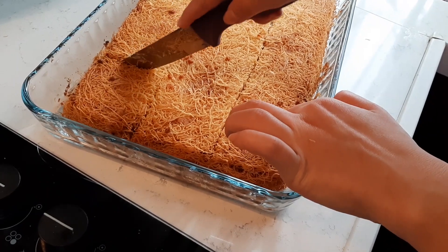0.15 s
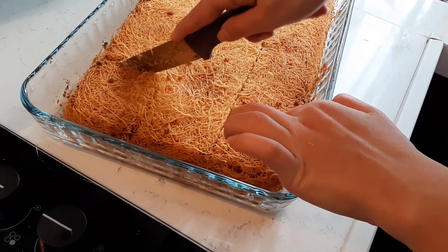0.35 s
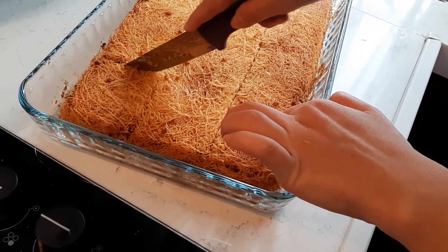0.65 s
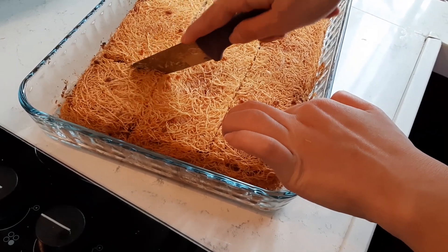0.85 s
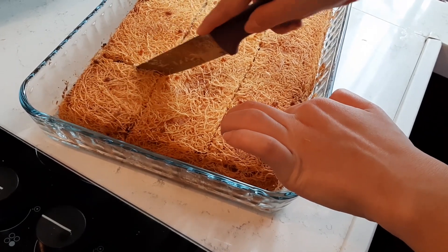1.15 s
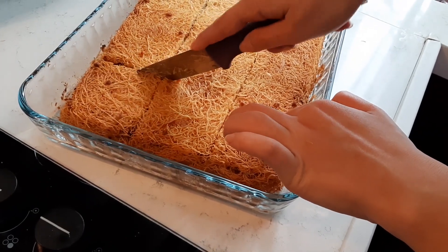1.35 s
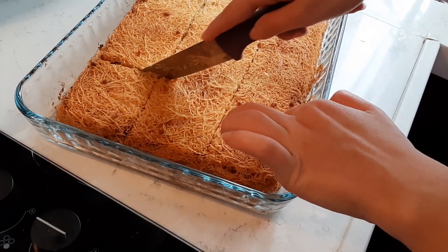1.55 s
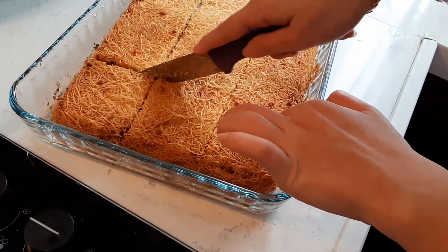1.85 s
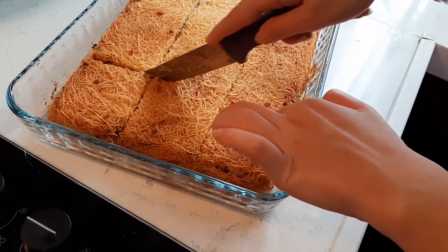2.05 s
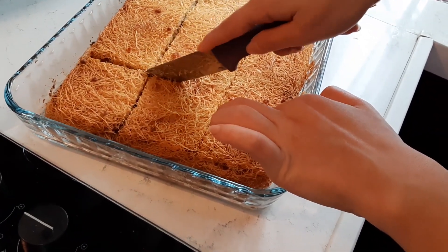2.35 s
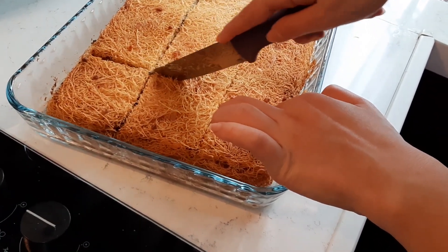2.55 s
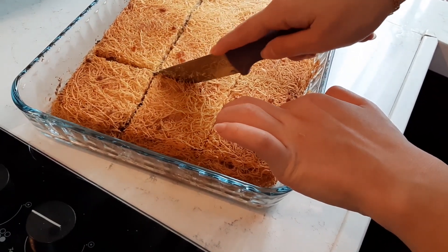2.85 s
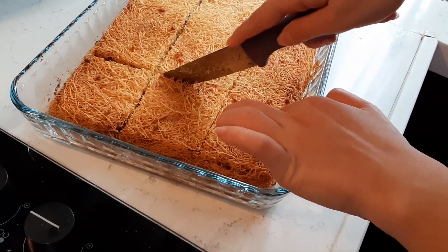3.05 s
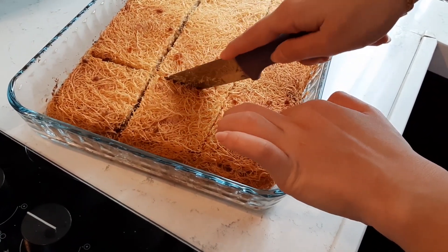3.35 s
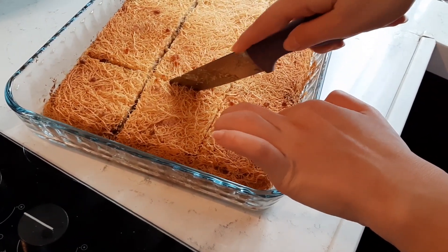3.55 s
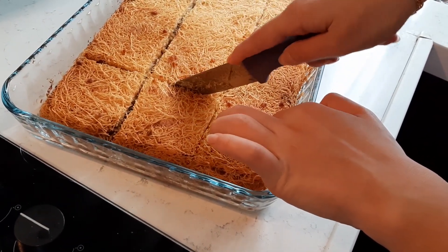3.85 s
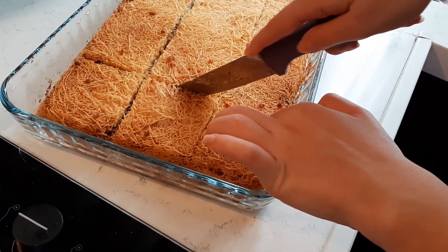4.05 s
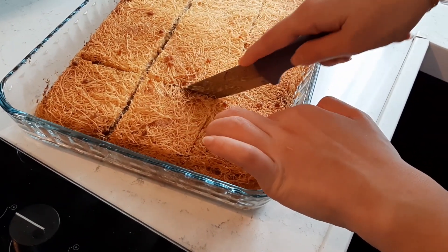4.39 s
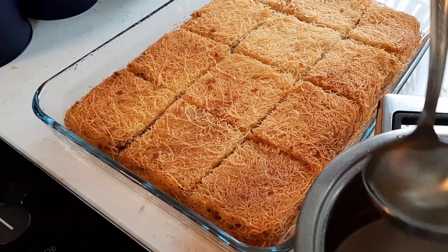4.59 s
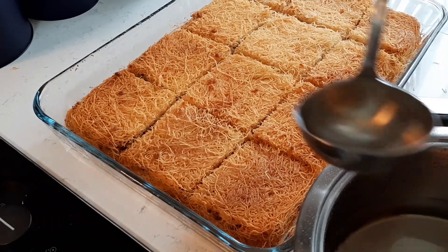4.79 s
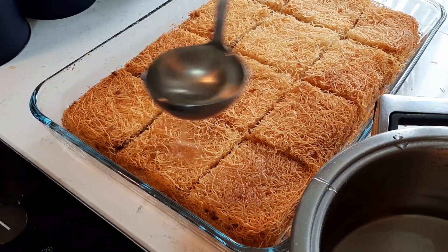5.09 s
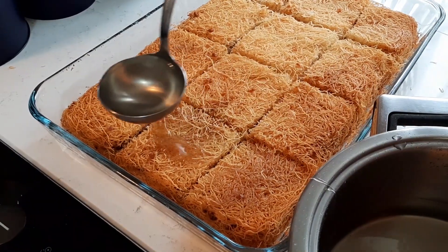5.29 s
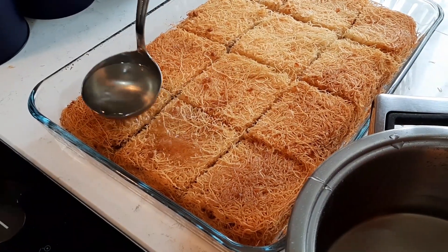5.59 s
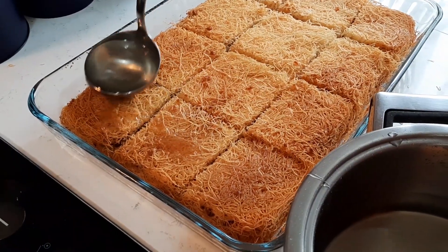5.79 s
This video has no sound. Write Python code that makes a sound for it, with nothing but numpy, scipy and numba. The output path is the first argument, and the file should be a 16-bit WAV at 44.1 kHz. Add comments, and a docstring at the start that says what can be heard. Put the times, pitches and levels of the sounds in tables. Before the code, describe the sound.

Close stereo in a small hard kitchen: a knife bites through dry shredded pastry about twice a second, crackling brittle strands and ending each stroke with a loud clack on glass. Lighter scrapes, faint edge whines and dish rumble fill the gaps. At about 4.5 seconds the cutting cuts off, leaving faint appliance noise, a soft falling squeak, a drop's tick and light rustles.

```python
"""Knife through crisp pastry in a glass dish

Two microphones close by in a small hard kitchen. A knife saws through shredded pastry: random fractures make the
crunch, damped modes of the dish ring at each knock, and filtered noise makes the rub of the blade, the rumble of
the dish on the counter, a short early ping and the gliding whine of the edge. The cutting stops short, and over the
steady kitchen noise come a squeak of falling pitch, a drop of syrup as a tick of noise, and soft rustles of noise."""
import sys
import numpy as np
from scipy import signal
from scipy.fft import rfft, irfft, next_fast_len
from scipy.io import wavfile
from scipy.ndimage import uniform_filter1d
from numba import njit

SR = 44100
rng = np.random.default_rng(int(sys.argv[2]) if len(sys.argv) > 2 else 0)


def to_wav(s):
    """Save 16-bit WAV."""
    ch = np.atleast_2d(s).T  # columns
    pcm = np.round(np.clip(ch, -1, 1) * 32767)  # PCM
    wavfile.write(sys.argv[1], SR, pcm.astype(np.int16))


N = 261513  # length of the scene in samples
FAST = next_fast_len(N)  # a length at or above N that transforms quickly

# Small hard room. Each row: frequency in Hz, time to die away by 60 dB in s.
ROOM_T60 = [(100, 0.29), (500, 0.18), (2000, 0.19), (6000, 0.12), (14000, 0.13)]
# Likeness of left and right microphone. Each row: frequency in Hz, correlation from -1 to 1.
ALIKE = [(60, .93), (150, .96), (350, .88), (700, .55), (1300, 0), (2500, -.12), (5000, .05), (16000, .05)]
# Colour of the left microphone against the right. Each row: frequency in Hz, left minus right in dB.
TILT = [(60, -0.5), (110, 1.5), (200, 0), (380, -5.5), (700, -1.5), (1290, -1), (2380, -2), (4400, -0.5),
        (8120, -3), (15000, 2.5)]
ROLL_OFF_HZ, TOP_HZ = 15800, 16650
BANDS = 40 * 2 ** np.arange(0, 9, .5)  # centres of half-octave slices, Hz
FADE_DB = 30  # depth that a rise or fall covers

# Kitchen background noise. Each row: frequency in Hz, density in dB per Hz.
KITCHEN = [(25, -23), (50, -0.5), (110, 1), (200, -9.5), (310, -9), (630, -10), (1000, -9.5), (1600, -8.5),
           (3000, -19.5), (5000, -11.5), (8000, -26), (10000, -39), (13000, -18.5), (15700, -13)]
KITCHEN_DB = -61
# Appliance tones. Each row: frequency in Hz, rms level in dB about which the tone wavers.
HUM = [(285.3, -74.5), (355.3, -90), (495.3, -81.5)]
# Soft rustles. Each row: start in seconds, length in seconds, low, middle and high level in dB.
RUSTLES = [(4.775, 0.11, -64.5, -64, -66), (5.089, 0.056, -66, -75, -59), (5.116, 0.013, -70, -53, -68),
           (5.164, 0.025, -56, -63, -66), (5.286, .18, -72.5, -66, -73), (5.527, 0.021, -69.5, -73.5, -82),
           (5.664, .02, -71, -71, -70), (5.8, 0.098, -78.5, -75, -88)]
RUSTLE_RISE_S, RUSTLE_FALL_S = 0.042, .1

# Colour of the landing drop. Each row: frequency in Hz, density in dB per Hz.
TICK = [(700, -29), (1600, 4), (3000, -10), (5000, 6), (8500, -12), (11500, -4), (15500, -7)]
TICK_S, TICK_DB = 5.0755, -43.5

# Overtones of the squeak. Each row: multiple of the pitch, level in dB.
SQUEAK_PARTIALS = [(1, 0), (2, -3.5), (3, -10), (4, -28), (5, -38)]
SQUEAK_S, SQUEAK_DB = 4.785, -47.5  # moment of full grip, and level
SQUEAK_RISE_S, SQUEAK_HOLD_S, SQUEAK_FALL_S = .09, 0.071, .17
SQUEAK_HZ, SQUEAK_SAG_HZ_PER_S = 2730, 500

# Dish rumbling on the counter top. Each row: frequency in Hz, density in dB per Hz.
RUMBLE = [(25, -48), (50, -8), (105, 3.5), (160, -1), (230, -12), (400, -37)]
# Dish dragging. Each row: frequency in Hz, density in dB per Hz.
DRAG = [(170, -23.5), (300, 0.5), (420, -6.5), (560, -8), (900, -29.5)]
# The dish shifts on the counter. Each row: start in seconds, end in seconds, rumble level in dB, drag level in dB,
# swell until the end in dB.
SHOVES = [(0.0, 0.11, -80, -65, -2), (0.857, 0.927, -62.5, -46.5, -3.5), (1.003, 1.102, -47.5, -46.5, -3),
          (1.13, 1.248, -53.5, -56.5, 1.5), (1.602, 1.707, -52, -50, -10), (2.23, 2.305, -53, -57.5, 4.5),
          (2.684, 2.798, -67.5, -62, 8), (3.42, 3.775, -57.5, -62, 4), (3.868, 4.04, -52.5, -64, -6),
          (4.378, 4.534, -60, -61.5, -0.5)]
SHOVE_RISE_S, SHOVE_FALL_S, RUMBLE_REST_DB, DRAG_REST_DB = 0.058, 0.07, -70, -71

# Blade rubbing against crumb. Each row: frequency in Hz, density in dB per Hz.
SLIDE = [(500, -14.5), (850, -4), (1150, -7), (1600, 2.5), (2300, -5), (2900, -12), (5000, -21.5)]
# A short ping near 4.3 kHz in the first row, then the edge singing along the glass.
# Each row: start in seconds, length in seconds, level in dB, pitch at the start in Hz.
PING_AND_WHINES = [(0.199, .006, -46, 4280), (1.238, .04, -62, 4950), (1.62, .035, -54.5, 4950),
                   (2.011, .14, -57, 4740), (2.412, .09, -53, 4850), (3.565, 0.13, -56, 4886),
                   (3.985, .07, -56, 4800)]
WHINE_RISE_S, WHINE_SWELL_DB, WHINE_FADE_S = .012, -3.5, .025
WHINE_REST_HZ, WHINE_SAG_HZ_PER_S, WHINE_WIDTH_HZ = 4390, 5900, 400.

# Colour of breaking crust. Each row: frequency in Hz, density in dB per Hz.
CRUNCH = [(350, -44.5), (600, -14.5), (679, -18), (868, -10.5), (1160, -22), (2000, -22), (3020, -16.5),
          (4250, -12.5), (5360, -10.5), (7240, -6.5), (8770, -20), (12000, 0), (15800, -2)]
# Single strands snapping. Each row: time in seconds, level in dB, left minus right in dB.
SNAPS = [(0.1514, -30, -6), (0.162, -30, 1), (0.176, -27.5, -2), (0.198, -21, -5), (0.2335, -17, -10.5),
         (0.409, -34, 5), (0.7047, -27, -6), (1.1737, -29, -12), (1.6572, -26, -11), (1.766, -8, 8),
         (1.954, -39, -8), (2.1493, -22.5, -6.5), (2.1694, -20.5, 2), (2.2058, -16, -10),
         (2.2354, -10.5, -12), (2.241, -26, 2.0), (2.307, -21, 4), (2.615, -22.5, 8), (2.6727, -12.5, -1),
         (2.7228, -17, 1), (2.7614, -22, -1), (2.796, -16, 6), (3.1523, -18.5, 2), (3.1755, -31, -7),
         (3.19, -19, -7), (3.3977, -25, -1), (3.469, -28, 0.0), (3.6706, -37, -6), (3.683, -17, 5),
         (3.6962, -12.5, -4), (3.717, -13, 5), (3.7344, -12.5, 10), (3.8394, -23, 3), (4.129, -26, -6),
         (4.1826, -23, 4), (4.2306, -10, -4), (4.2505, -13, -0.5)]
# Light passes of the blade between cuts. Each row: start in seconds, end in seconds, crunch level in dB,
# swell until the end in dB, slide level in dB.
PASSES = [(0.018, 0.113, -50.5, -5.5, -55), (0.459, 0.67, -55.5, 4, -67), (0.974, 1.22, -58, -7.5, -54.5),
          (1.46, 1.614, -55.5, -4, -72), (1.951, 2.104, -51, -3.5, -85), (2.156, 2.193, -51.5, 4.5, -83),
          (2.449, 2.549, -42.5, 2.5, -68.5), (2.61, 2.673, -44.5, 3, -67), (2.94, 3.033, -46, -3, -66),
          (3.103, 3.143, -47.5, 1, -51.5), (3.444, 3.545, -52, 5, -65), (3.558, 3.66, -54, -2, -51),
          (3.918, 4.032, -50.5, 1.5, -57.5), (4.081, 4.092, -48, 2, -62), (4.416, 4.527, -51, -2.5, -50)]
PASS_RISE_S, PASS_FALL_S = 0.061, 0.059
# The blade bites and saws down to the next knock. Each row: start in seconds, crunch level in dB,
# swell until the crust gives way in dB, slide, collapse and press (on the dish) levels in dB.
BITES = [(0.15, -53, 12, -70, -29, -35), (0.685, -47.5, 8.5, -64.5, -23, -34.5),
         (1.224, -50, 15, -65, -31, -34), (1.661, -43, 1, -58, -32, -34),
         (2.207, -35.5, 1.5, -51.5, -38, -28.5), (2.669, -36.5, 3, -52.5, -31.5, -26.5),
         (3.152, -44.5, 17.5, -56.5, -24.5, -29), (3.68, -37, -1, -50, -28.5, -33.5),
         (4.13, -48, 14.5, -65.5, -22, -28.5)]
BITE_RISE_S, BITE_FALL_S = 0.0061, 0.033
BITE_WHINE_DB, BITE_RUMBLE_DB = -17, -22  # re the crunch of a bite
# the crust gives way just before the knock; levels re the crunch of the collapse
COLLAPSE_LEAD_S, COLLAPSE_RISE_S, COLLAPSE_FALL_S = 0.01, 0.033, 0.068
COLLAPSE_SLIDE_DB, COLLAPSE_WHINE_DB, COLLAPSE_RUMBLE_DB, COLLAPSE_DRAG_DB = -13, -19.5, -29.5, -23.5
SLIDE_FALL_S, RUMBLE_FALL_S = .2, 0.32  # slide, whine and drag, then rumble, outlast the collapse
# packed crumb grinds on the glass up to the knock
PRESS_LEAD_S, PRESS_RISE_S, PRESS_FALL_S = .003, 0.028, 0.04

# Blade meets glass. Each row: time in seconds, level in dB, then thud, body, treble and crack in dB re that level,
# left minus right in dB.
KNOCKS = [(0.3093, -17.5, -13.5, -11, -0.5, -4, -9), (0.8029, -13, -20.5, -9.5, -2.5, -7, -3.5),
          (1.3358, -18.5, -15.5, -8.5, -1.5, -8, -2.5), (1.8044, -19.5, -13, -5.5, -0.5, -5.5, -4),
          (2.3353, -27, -8, -4, -1.5, -7, -5), (2.834, -19.5, -12.5, -6, -3, -6.5, -2.5),
          (3.3009, -16, -11.5, -7, -2, -8, -7.5), (3.7851, -16, -14, -8, -5, -7.5, -0.5),
          (4.2666, -14.5, -12, -9.5, -3, -6, 4)]
# Modes of the dish for an average blow. Each row: frequency in Hz, level in dB, time to die away by 60 dB in s.
GLASS = [(470.6, -23.5, 0.09), (640, -16.5, 0.086), (739, -7, 0.057), (818, -8, 0.086), (1299.5, -16, 0.16),
         (1470, -7, 0.086), (1538, -9, 0.15), (1687, -11.5, 0.093), (1719, -3.5, 0.047), (1795, 1, 0.026),
         (2020, -9, 0.14), (1996, -2.5, 0.054), (2274, 0.5, 0.038), (2357, 2.5, 0.094), (2417, 3.5, 0.071),
         (2870, -10.5, 0.097), (3490, -12, 0.044), (3778, -9, 0.042), (3859, -8.5, 0.14), (4142, 0, 0.06),
         (4250, -3.5, 0.058), (5820, -9.5, 0.033), (5895, 2, 0.029), (5780, -2.5, 0.05), (6650, -11, 0.051),
         (6765, -12.5, 0.033), (6500, -16, 0.034), (7260, -14.5, 0.037)]
# Broad body of a knock. Each row: frequency in Hz, density in dB per Hz.
CLACK = [(59, -41), (100, -17.5), (223, -20.5), (654, -14.5), (727, -25), (843, -11.5), (1090, -19.5),
         (2370, -1.5), (3050, -25), (3690, -7), (4960, -19.5), (6390, -8), (8410, -28.5), (11300, -13),
         (15500, -26.5)]
CUTTING_END_S = 4.537  # the cutting and its room sound stop short here


def undb(db):
    """Amplitude factor of a level in dB."""
    return 10 ** (np.asarray(db) / 20)


def unit(x):
    """Scale to an rms of 1."""
    return x / np.sqrt(np.mean(x ** 2))


def at_hz(table, hz):
    """Read a (Hz, value) table on a log-frequency axis."""
    table_hz, values = np.array(table)[:, 0], np.array(table)[:, 1]
    return np.interp(np.log(hz + 1), np.log(table_hz + 1), values)


def colour(x, table):
    """Causal minimum-phase filter with the gains of a (Hz, dB) table, power kept for white input."""
    log_gain = at_hz(table, np.fft.rfftfreq(4096, 1 / SR)) * np.log(10) / 20
    # folding the cepstrum onto positive time makes the filter causal
    cepstrum = irfft(log_gain)
    cepstrum[1:2048] *= 2
    cepstrum[2049:] = 0
    taps = irfft(np.exp(rfft(cepstrum)))
    taps = taps / np.linalg.norm(taps)
    return signal.oaconvolve(x, taps[None], axes=1)[:, :x.shape[1]]


def pair(size):
    """White noise for two microphones: alike in the bass, nearly unrelated in the treble."""
    alike = np.clip(at_hz(ALIKE, np.fft.rfftfreq(size, 1 / SR)), -1, 1)
    mid, side = rfft(rng.standard_normal((2, size)))
    mid = mid * np.sqrt((1 + alike) / 2)
    side = side * np.sqrt((1 - alike) / 2)
    return irfft([mid + side, mid - side], size)


def bands(x):
    """Overlapping half-octave slices that add up to x between the lowest and highest centre."""
    octave = np.log2(np.fft.rfftfreq(x.shape[1], 1 / SR) + 1)
    spectrum = rfft(x)
    for hz in BANDS:
        window = np.cos(np.pi * np.clip(octave - np.log2(hz), -.5, .5)) ** 2
        yield hz, irfft(spectrum * window, x.shape[1])


def walk(rate):
    """Random levels, one each 1 / rate s, joined by straight slopes; spread near 1."""
    k = int(SR / rate)
    held = np.repeat(rng.standard_normal(N // k + 1), k)
    return 1.2 * uniform_filter1d(held, k)[:N]


def pan(db):
    """Left and right gains for a left minus right difference in dB."""
    return undb(np.array([db, -np.asarray(db)]) / 2)


def room(dry, wet_db):
    """Direct sound plus dense reflections that die away band by band."""
    t = np.arange(SR // 2) / SR
    echo = sum(part * undb(-60 * t / at_hz(ROOM_T60, hz)) for hz, part in bands(pair(size=len(t))))
    echo *= 1 - np.exp(-t / 0.00053)
    source = dry.sum(axis=0)[None] / np.sqrt(2)
    reflections = signal.oaconvolve(source, echo / np.linalg.norm(echo[0]), axes=1)[:, :N]
    return dry + undb(wet_db) * reflections


def burst(seconds):
    """White noise for both microphones dying away exponentially, with the given time constant."""
    t = np.arange(int(8 * seconds * SR)) / SR
    return pair(size=len(t)) * np.exp(-t / seconds)


def add(track, s, sound):
    """Mix a sound into a track from s seconds on."""
    i = int(s * SR)
    track[:, i:i + sound.shape[1]] += sound[:, :N - i]


def friction(table, flicker_db, rate):
    """Rubbing noise in the colour of a table; every band flickers on its own."""
    noise = colour(pair(size=FAST), table)
    return sum(part[:, :N] * undb(flicker_db * walk(rate)) for hz, part in bands(noise))


def swells(start, end, db, swell_db, rise_s, fall_s):
    """Power of a row of gestures, each a rise, a hold that swells and a fall."""
    grid_s = np.arange(0, N / SR + .002, .001)
    power = 0
    for a, b, d, g in np.broadcast(start, np.maximum(start, end), db, swell_db):
        corners_s = [a - rise_s, a, b, b + fall_s]
        corners_db = [d - FADE_DB, d, d + g, d + g - FADE_DB]
        power = power + undb(2 * np.interp(grid_s, corners_s, corners_db, -200, -200))
    return np.interp(np.arange(N) / SR, grid_s, power)


def hum():
    """Faint steady appliance tones, each a sine that wavers in level."""
    t = np.arange(N) / SR
    return sum(undb(db + 2.7 * walk(9.7)) * np.sqrt(2) * np.sin(2 * np.pi * hz * t) for hz, db in HUM)


def rustles():
    """Soft rustles late in the scene: rubbing noise in three ranges that swell independently in level."""
    start, length, *levels_db = np.transpose(RUSTLES)
    low, middle, high = (np.sqrt(swells(start, start + length, db, 0, RUSTLE_RISE_S, RUSTLE_FALL_S))
                         for db in levels_db)
    low = low * friction([(80, -1.5), (250, 0.5), (450, 4.0), (1500, -26)], 2.5, 31)
    middle = middle * friction([(900, -10.5), (1500, 1.5), (2200, -6.0), (3000, -35.0)], 3.9, 25)
    high = high * friction([(2200, -8), (3300, 1.0), (5000, -4.5), (8000, -15), (12000, -49)], 5.0, 25)
    return low + middle + high


def kitchen():
    """Background of the place: steady coloured noise, appliance tones and a few rustles."""
    return undb(KITCHEN_DB) * friction(KITCHEN, 0.97, 10.0) + hum() + rustles()


def tick():
    """A drop lands: a short broad tick of noise with a little room behind it."""
    out = np.zeros((2, N))
    add(out, TICK_S, undb(TICK_DB) * colour(burst(.003), TICK))
    return room(out, -2.0)


def squeak():
    """A stick-slip squeak: a falling, throbbing pitch whose overtones fade sooner, smeared by the room."""
    hz = SQUEAK_HZ - SQUEAK_SAG_HZ_PER_S * (np.arange(N) / SR - SQUEAK_S)
    phase = 2 * np.pi * np.cumsum(hz * (1 + .009 * walk(200))) / SR
    grip = np.sqrt(swells(SQUEAK_S, SQUEAK_S + SQUEAK_HOLD_S, 0, -2.6, SQUEAK_RISE_S, SQUEAK_FALL_S))
    tone = 0
    for k, partial_db in SQUEAK_PARTIALS:
        throb = undb(partial_db + 3.0 * walk(110))
        tone = tone + throb * grip ** (1 + .08 * (k - 1)) * np.sin(k * phase)
    return room(np.tile(tone * undb(SQUEAK_DB), (2, 1)), 2.9)


def dish(rumble, drag, press):
    """The dish rumbles and drags on the counter, and packed crumb grinds on its glass: three coloured noises."""
    shifting = friction(RUMBLE, 2.0, 14) * rumble + friction(DRAG, 2.1, 30) * drag
    grinding = colour(pair(size=FAST), CLACK)[:, :N] * undb(3.0 * walk(150)) * press
    return shifting + grinding


@njit
def glide(x, hz, width):
    """State-variable band-pass whose centre moves every sample."""
    y, b, l = np.empty(len(x)), 0., 0.  # output, band and low-pass states
    for i in range(len(x)):
        g, k = np.tan(np.pi * hz[i] / SR), width / hz[i]
        v = (b + g * (x[i] - l)) / (1 + g * (g + k))
        b, l, y[i] = 2 * v - b, l + 2 * g * v, k * v
    return y


def ping_and_whine(hz):
    """Noise through a gliding resonance: a short ping, and the edge on the glass, tuned by the blade's free length."""
    ringing = np.array([glide(x, hz, WHINE_WIDTH_HZ) for x in pair(size=FAST)[:, :N]])
    return unit(ringing) * undb(3.1 * walk(40))


def blade(slide, ringing, ringing_hz):
    """The blade rubs against crumb as flickering noise, with the ping and the whine of its edge on top."""
    return friction(SLIDE, 2.8, 30) * slide + ping_and_whine(ringing_hz) * ringing


def strands(crunch):
    """Dense tiny fractures of very uneven size, in flurries; the loudest snaps stand alone."""
    breaks = rng.random(N) < 2500. / SR  # 2500 fractures per second on average
    sizes = undb(6.6 * np.minimum(rng.exponential(size=N), 4.0)) * breaks
    grains = uniform_filter1d(sizes, size=9) * pair(size=N)
    wander = pan(3.5 * walk(6.2))  # the breaking strands lie now left, now right of the blade
    texture = unit(unit(grains) + .7 * pair(size=N))
    crackle = texture * crunch * undb(3.03 * walk(90)) * wander
    for s, level_db, side_db in SNAPS:
        add(crackle, s, undb(level_db - 6.5) * pan(side_db)[:, None] * burst(.001))
    return room(colour(crackle, CRUNCH), -1.5)


def knocks():
    """Each blow rings the modes of the dish, which reach the microphones in different phase, and chatters briefly."""
    t = np.arange(SR // 4) / SR
    hz, db, t60 = np.transpose(GLASS)[:, :, None]
    apart = np.arccos(np.clip(at_hz(ALIKE, hz), -1, 1)) * rng.choice([-1, 1], hz.shape)
    out = np.zeros((2, N))
    usual_db = np.mean(KNOCKS, axis=0)[2:6]  # the modes describe the average blow
    for s, level_db, *tones_db, pan_db in KNOCKS:
        thud_db, body_db, treble_db, crack_db = tones_db - usual_db
        spot = undb(db + 3.06 * rng.standard_normal(db.shape))  # every blow lands on another spot
        mode_hz = hz * (1 + .003 * rng.standard_normal(hz.shape))
        phase = 2 * np.pi * (mode_hz * t + rng.random(hz.shape))
        ring = spot * undb(-60 * t / t60) * np.sin([phase, phase + apart]) * (1 - np.exp(-t / 0.00099))
        crumbs = burst(0.023)  # crust keeps collapsing behind the blade, in fits
        crumbs = crumbs * undb(-11.5 + 4.6 * walk(200)[:crumbs.shape[1]])
        add(crumbs, 0, burst(0.0033))  # the contact itself
        clack = colour(crumbs, CLACK)
        blow = undb(-8.0) * ring.sum(axis=1)
        blow[:, :clack.shape[1]] += undb(3.5) * clack
        colours = [(700, thud_db), (1600, body_db), (2400, 0), (5000, treble_db), (11000, crack_db)]
        add(out, s, undb(level_db) * pan(pan_db)[:, None] * colour(blow, colours))
    return room(out, -3.7)


def strokes():
    """Gains of crunch, slide, ping and whine, rumble, drag and press over time, and the pitch of ping and whine."""
    t = np.arange(N) / SR
    knock_s = np.array(KNOCKS)[:, 0]
    gives, grinds = knock_s - COLLAPSE_LEAD_S, knock_s - PRESS_LEAD_S
    bite, crunch_db, swell_db, slide_db, collapse_db, press_db = np.transpose(BITES)
    start, end, light_db, light_swell_db, light_slide_db = np.transpose(PASSES)
    rings, length, ring_db, _ = np.transpose(PING_AND_WHINES)
    moves, stops, rumble_db, drag_db, shove_swell_db = np.transpose(SHOVES)

    def biting(db):
        """Power while the blade saws down until the crust gives way."""
        return swells(bite, gives, db, swell_db, BITE_RISE_S, BITE_FALL_S)

    def collapse(re_db, fall_s):
        """Power as the crust gives way."""
        return swells(gives, gives, collapse_db + re_db, 0, COLLAPSE_RISE_S, fall_s)

    def passing(db):
        """Power of the light passes."""
        return swells(start, end, db, light_swell_db, PASS_RISE_S, PASS_FALL_S)

    def shoving(db):
        """Power while the dish shifts."""
        return swells(moves, stops, db, shove_swell_db, SHOVE_RISE_S, SHOVE_FALL_S)

    crunch = passing(light_db) + biting(crunch_db) + collapse(0, COLLAPSE_FALL_S)
    slide = passing(light_slide_db) + biting(slide_db) + collapse(COLLAPSE_SLIDE_DB, SLIDE_FALL_S)
    ringing = (swells(rings, rings + length, ring_db, WHINE_SWELL_DB, WHINE_RISE_S, WHINE_FADE_S)
               + biting(crunch_db + BITE_WHINE_DB) + collapse(COLLAPSE_WHINE_DB, SLIDE_FALL_S))
    rumble = (shoving(rumble_db) + biting(crunch_db + BITE_RUMBLE_DB)
              + collapse(COLLAPSE_RUMBLE_DB, RUMBLE_FALL_S) + undb(2 * RUMBLE_REST_DB))
    drag = shoving(drag_db) + collapse(COLLAPSE_DRAG_DB, SLIDE_FALL_S) + undb(2 * DRAG_REST_DB)
    press = swells(grinds, grinds, press_db, 0, PRESS_RISE_S, PRESS_FALL_S)

    ringing_hz = np.full(N, 1. * WHINE_REST_HZ)
    for s, long_s, _, first_hz in PING_AND_WHINES:
        sounding = (t > s - WHINE_RISE_S) & (t < s + long_s + WHINE_FADE_S)
        ringing_hz = np.where(sounding, first_hz - WHINE_SAG_HZ_PER_S * (t - s), ringing_hz)
    return *np.sqrt([crunch, slide, ringing, rumble, drag, press]), ringing_hz


def scene():
    """The kitchen throughout, the cutting until it stops short, then the squeak and the drop."""
    crunch, slide, ringing, rumble, drag, press, ringing_hz = strokes()
    cutting = dish(rumble, drag, press) + blade(slide, ringing, ringing_hz) + strands(crunch) + knocks()
    cutting = cutting * (np.arange(N) < CUTTING_END_S * SR)
    return kitchen() + tick() + squeak() + cutting


def record(dry):
    """The microphones differ in colour and round the loudest peaks; the treble ends in a step, then a steep cut."""
    tilt = undb(at_hz(TILT, np.fft.rfftfreq(FAST, 1 / SR)) * np.array([[.5], [-.5]]))
    tilted = irfft(rfft(dry, FAST) * tilt, FAST)[:, :N]
    heard = np.tanh(tilted)
    step = signal.sosfilt(signal.ellip(6, .3, 28, ROLL_OFF_HZ, fs=SR, output="sos"), heard)
    return signal.sosfilt(signal.ellip(14, .2, 120, TOP_HZ, fs=SR, output="sos"), step)


dry = scene()
out = record(dry)
to_wav(out)
```